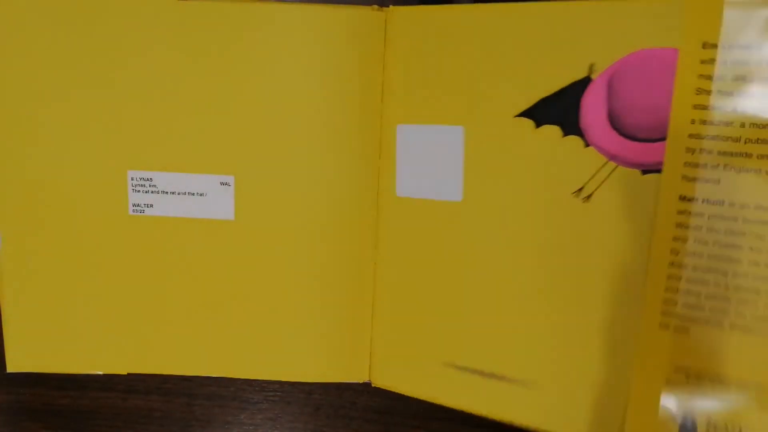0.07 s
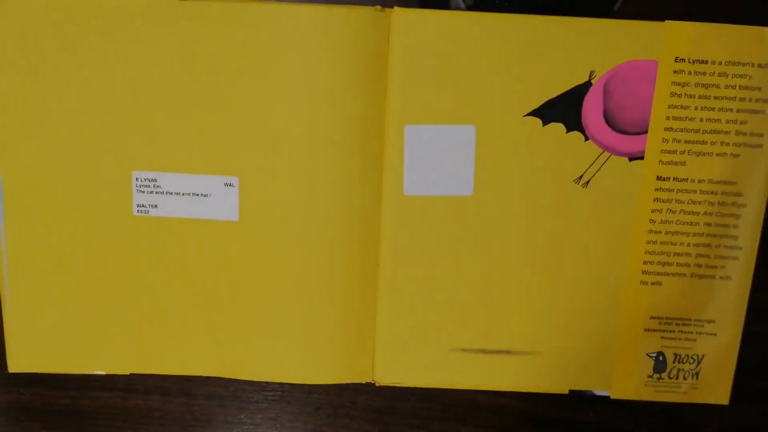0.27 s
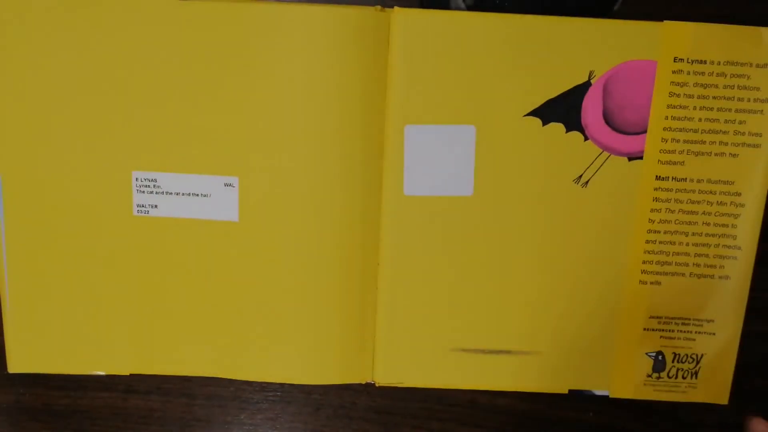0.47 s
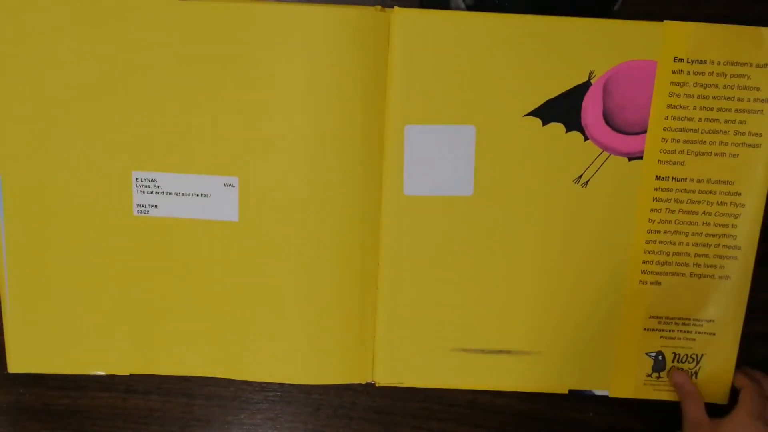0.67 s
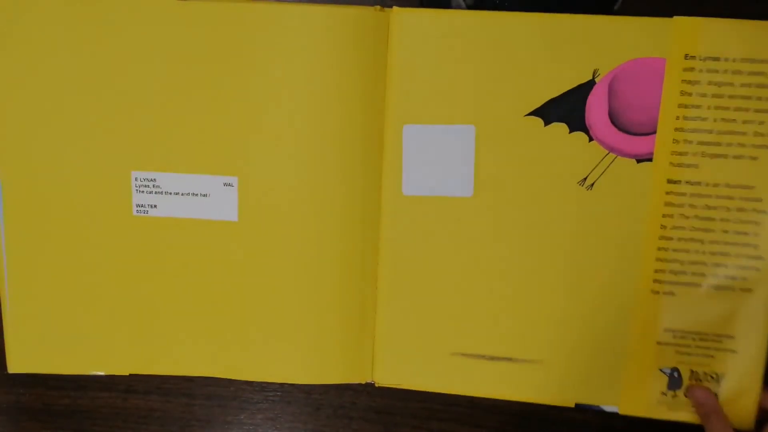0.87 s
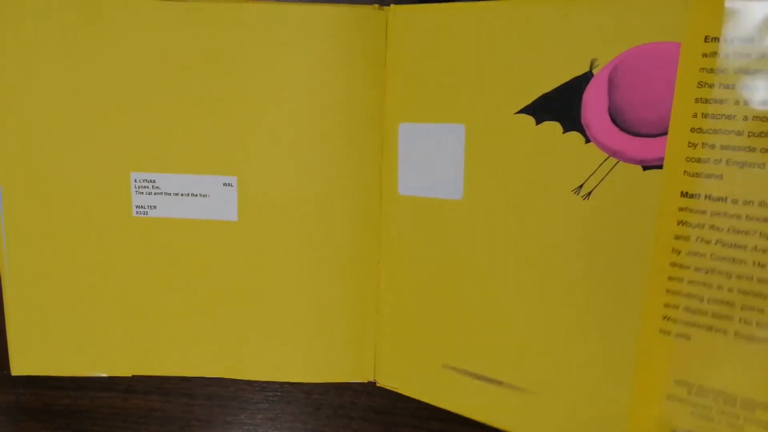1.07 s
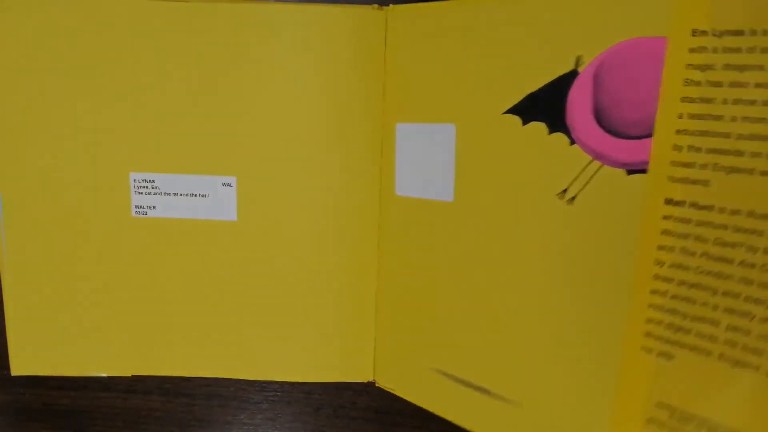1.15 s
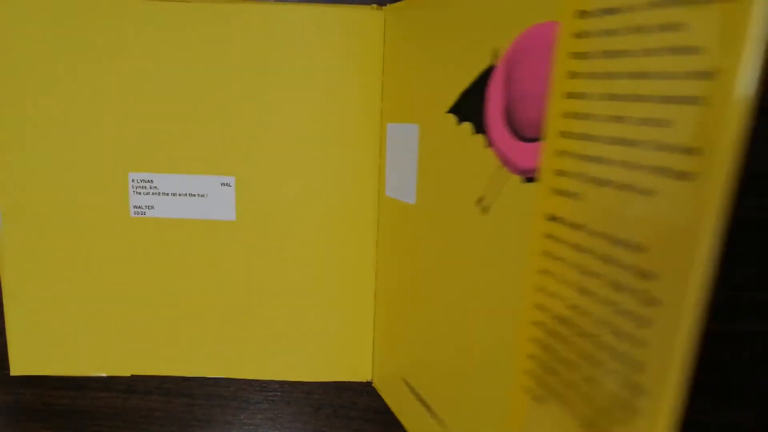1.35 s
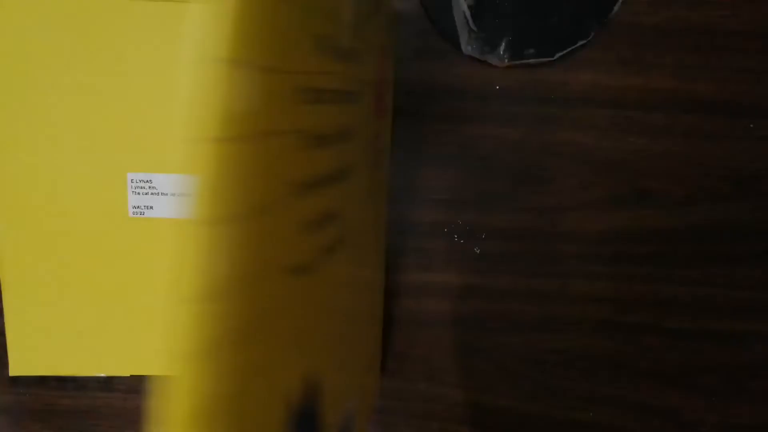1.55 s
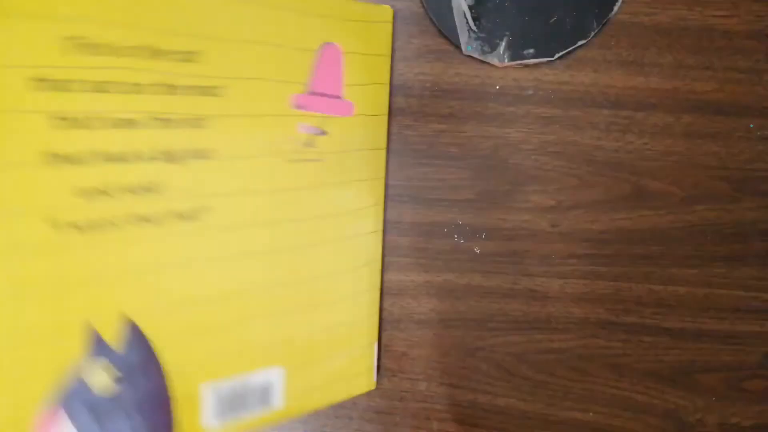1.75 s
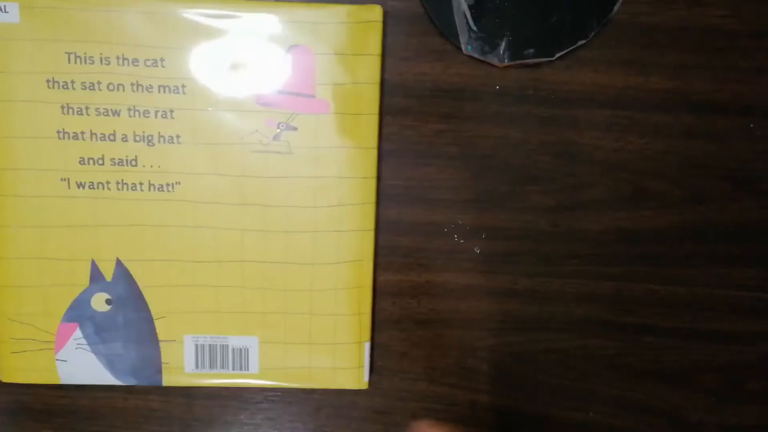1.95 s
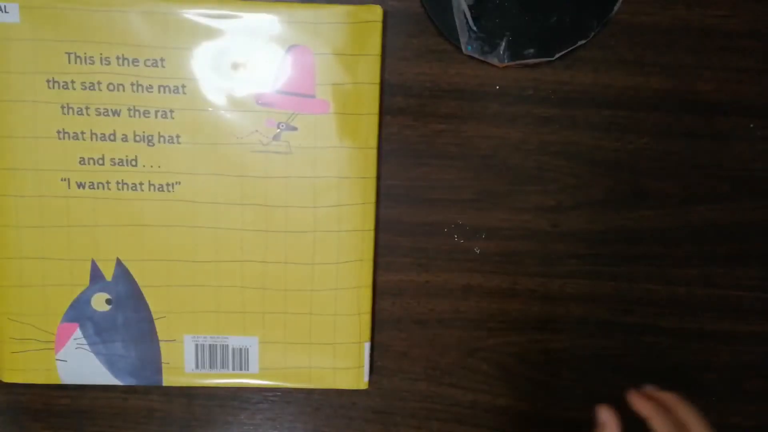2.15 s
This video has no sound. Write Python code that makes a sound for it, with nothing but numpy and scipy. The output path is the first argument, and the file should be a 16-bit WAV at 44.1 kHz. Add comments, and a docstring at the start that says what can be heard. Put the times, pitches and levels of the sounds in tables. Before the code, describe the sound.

Close to the microphones in a small room, a hardcover book slaps open onto a wooden table. Fingers lift the cover with light taps and jacket crinkles, moving left to right, until it falls closed with a thump.

```python
"""In a small, bare room, a hardcover book in a glossy jacket is handled on a wooden table.
The back cover drops open with a slap, pushing out air and making the table ring. Fingers lift it
while the jacket's creases crackle and paper rubs, and the book falls shut with a thump.
Two close microphones, each with its own treble ring, hear it move from left to right over a low rumble."""
import sys
import numpy as np
from scipy import signal
from scipy.fft import rfft, irfft
from scipy.io import wavfile

SR = 44100
rng = np.random.default_rng(int(sys.argv[2]) if len(sys.argv) > 2 else 0)


def transcribe(signal):
    """Save signal, clipped to [-1, 1], as a 16-bit WAV file at the path in sys.argv[1]."""
    frames = np.atleast_2d(signal).T
    limited = np.clip(frames, -1, 1)
    pcm = np.round(limited * 32767).astype(np.int16)
    wavfile.write(sys.argv[1], SR, pcm)


N = 97020
TIME = np.arange(N) / SR
HZ = np.maximum(np.fft.rfftfreq(2 * N, 1 / SR), 1)
TILT_FROM_HZ = 1500  # a tilt brightens or dulls a sound above this pitch
QUICK_S, RISE_SHARE = .0008, .3  # a very fast rise or fade; rise time as a share of fade time


def amp(db):
    """Turns decibels into a number to multiply by."""
    return 10 ** (np.asarray(db) / 20)


def read(points, hz=HZ):
    """Fills in a table between its pitches, giving each octave equal room."""
    pitches, values = np.transpose(points)
    return np.interp(np.log(hz + 1), np.log(pitches + 1), values)


def level(points):
    """Turns times and levels into a smoothly changing volume."""
    return amp(np.interp(TIME, *np.transpose(points)))


def unit(x):
    """Scales a sound to an average energy of 1 per channel."""
    return x / np.sqrt(np.mean(np.sum(x ** 2, -1)) + 1e-20)


def add(mix, start_s, sound):
    """Mixes a sound in at its start time."""
    part = mix[:, max(round(start_s * SR), 0):][:, :sound.shape[-1]]
    part += sound[..., :part.shape[1]]


def ring(gain, size=4096):
    """How a filter with this gain at each pitch rings after one click."""
    gain = np.interp(np.fft.rfftfreq(size, 1 / SR), HZ, gain)
    folded = irfft(np.log(np.maximum(gain, 1e-5)))
    folded[1:size // 2] *= 2
    folded[size // 2 + 1:] = 0  # nothing sounds before the click
    return irfft(np.exp(rfft(folded)))


def through(x, response):
    """Plays a sound through a filter's ring or a room's echo."""
    return signal.fftconvolve(np.atleast_2d(x), np.atleast_2d(response), axes=1)[:, :N]


def hump(hz, octaves):
    """A filter shape with one broad peak."""
    return 1 / (1 + (np.log2(HZ / hz) / octaves) ** 2 / 2) ** 2


def paired(x):
    """Makes two channels alike in the bass and leaves them unrelated in the treble."""
    left, right = rfft(x)
    hz = np.fft.rfftfreq(x.shape[1], 1 / SR)
    alike = 0.81 / (1 + (hz / 810) ** 2)
    right = alike * left + np.sqrt(abs(1 - alike ** 2)) * right
    return irfft(np.array([left, right]), x.shape[1])


def noise(size):
    """Plain hiss at the two microphones."""
    return paired(rng.standard_normal((2, size)))


def wash(gain, grain_db=0):
    """Steady filtered noise; grain_db makes it gritty."""
    grains = amp(grain_db * np.minimum(rng.exponential(1, N), 6))
    return unit(through(noise(N) * grains, ring(gain))) * np.sqrt(N)


def burst(rise_s, fade_s, uneven=0, size=4096):
    """A quick cluster of tiny touches; uneven lets random pitches stand out."""
    t = TIME[:size]
    shape = np.minimum(t / rise_s, 1) * np.exp(-np.maximum(t - rise_s, 0) / fade_s)
    spectrum = rfft(rng.standard_normal((2, size)) * shape)
    spectrum /= (abs(spectrum) + 1e-12) ** (1 - uneven)
    return unit(paired(irfft(spectrum)) * np.sqrt(shape))


# Where the moving cover is: time_s, side (plus is left, minus is right)
COVER_PATH = [(1.1, 1), (1.45, -0.68), (1.85, -1.3)]
def place(mix, start_s, sound):
    """Mixes a sound in so that the nearer microphone hears it earlier and louder."""
    side = np.interp(start_s, *np.transpose(COVER_PATH)) * np.array([[.5], [-.5]])
    hz = np.fft.rfftfreq(sound.shape[-1], 1 / SR)
    lag_s = np.round((side.max() - side) * 0.00018 * SR) / SR
    delayed = irfft(rfft(sound) * np.exp(-2j * np.pi * hz * lag_s), sound.shape[-1])
    add(mix, start_s, amp(1.5 * side) * delayed)


# The background's tone: pitch_hz, level_db
RUMBLE_TONE = [(38, -4.5), (120, -13.5), (250, -23), (16000, -44.5)]
def rumble():
    """A quiet, low noise lies under everything."""
    return amp(-69) * wash(amp(read(RUMBLE_TONE)))


# How loud the table hums: time_s, level_db
HUM_LEVELS = [(0, -67.5), (.48, -80), (.62, -69), (.9, -69.5), (1.3, -94)]
def table_hum():
    """The table hums faintly under the moving book."""
    return level(HUM_LEVELS) * wash(hump(hz=82, octaves=0.43))


# How loud the cover slides and bends: time_s, level_db
RUB_LEVELS = [(.02, -56), (.06, -87), (.17, -69), (.222, -44), (.45, -65.5), (.52, -99.5), (.77, -69),
              (.89, -64), (1, -70.5), (1.25, -75), (1.8, -72.5), (1.88, -53), (2, -100)]
# The rubbing's tone: pitch_hz, level_db
RUB_TONE = [(100, -6), (900, 0), (1600, -5), (16000, -17.5)]
def paper_rub():
    """Paper catches and slips in clumps of fine grains."""
    slips_s = np.arange(0, N / SR, .012)
    clumps_db = 3.5 * np.interp(TIME, slips_s, rng.standard_normal(len(slips_s)))
    return level(RUB_LEVELS) * amp(clumps_db) * wash(amp(read(RUB_TONE)), grain_db=6)


# Creases that snap (short) or crinkle (long): start_s, level_db, body_db, tilt_db_per_octave, fade_s
CREASES = [(0.0636, -18.5, -40, 7, .002), (.1897, -24, 8, -3, 0.001), (0.202, -19, -14, 3.5, 0.003),
           (0.3259, -19, 5, 8, 0.0043), (0.4229, -20.5, -4, -10.5, 0.0018),
           (0.7333, -25, -14.5, -1.5, 0.003), (0.7385, -25, -32, -7, .005), (0.7448, -24, -20, -8, .0007),
           (0.7508, -22, -7, -3, .001), (.756, -28, 5, 2, .003), (0.78, -19.5, 7.5, 19, 0.00093),
           (0.835, -25.5, -14, -1.5, 0.0052), (0.8812, -18.5, 6, 20.5, 0.0029),
           (0.9012, -26, 19, 0, 0.0012), (1.034, -21, -4, 2.5, 0.0013), (1.281, -32, -7.5, 2.5, 0.017),
           (1.441, -20, -5, 3.5, 0.0047), (1.5841, -27.5, 14.5, 14.5, 0.003),
           (1.832, -21, -3.5, 12, 0.0031), (1.8424, -24, -25, -3, 0.0036)]
# A crease's bright tick: pitch_hz, level_db
TICK_TONE = [(1000, -37.5), (3800, -27), (5200, -3.5), (9000, -7), (16000, -21)]
# A crease's hollow body: pitch_hz, level_db
BODY_TONE = [(200, -31), (750, -3), (1400, -12.5), (2700, 4.5), (4200, -5.5), (16000, -53.5)]
def jacket_crackle():
    """Creases snap with a bright tick and a hollow body; faint ones go off at random during the lift."""
    out, tick, body = np.zeros((2, N)), read(TICK_TONE), read(BODY_TONE)
    octaves = np.log2(np.maximum(HZ, TILT_FROM_HZ) / 6000)
    lift_s = (.76, 1.68)
    faint = [(np.interp(when, (0, 1), lift_s), -44 + 3 * strength, 0, 0, QUICK_S)
             for when, strength in rng.random((9, 2))]
    for start_s, level_db, body_db, tilt, fade_s in CREASES + faint:
        tone = ring(amp(tick + tilt * octaves) + amp(body + body_db))
        snap = through(burst(RISE_SHARE * fade_s, fade_s, uneven=.5), tone)
        place(out, start_s, amp(level_db) * unit(snap))
    return out


# Fingers knocking on the stiff cover: start_s, level_db, pitch_hz, fade_s
FINGER_BUMPS = [(0.128, -38, 1088, 0.0083), (0.4224, -27, 685, 0.0041), (0.7004, -27.5, 316, 0.014),
                (.851, -22, 728.6, 0.028), (1.0649, -26.5, 1055, 0.0053), (1.1295, -34.5, 1404, 0.0013),
                (1.806, -35.5, 600, 0.0098)]
def finger_knocks():
    """Each bump rings the cover briefly at one pitch, with a dull scuff around it."""
    out = np.zeros((2, N))
    for start_s, level_db, pitch_hz, fade_s in FINGER_BUMPS:
        shape = np.minimum(TIME / (RISE_SHARE * fade_s), 1) * np.exp(-TIME / fade_s)
        note = shape * np.sin(2 * np.pi * pitch_hz * TIME)
        scuff = through(burst(QUICK_S, fade_s), ring(hump(pitch_hz, octaves=.8)))
        place(out, start_s, amp(level_db) * unit(note))
        place(out, start_s, amp(level_db - 1) * unit(scuff))
    return out


# Paper landing on paper: start_s, level_db, rise_s, fade_s, tilt_db_per_octave
PAGE_SLAPS = [(0.227, -4, 0.0063, 0.0092, 1.5), (1.8747, -7, 0.0061, 0.017, -2)]
# A slap's tone: pitch_hz, level_db
SLAP_TONE = [(150, -2.5), (620, 7), (1500, 0.5), (3000, 0), (6000, -3), (16000, -12)]
def page_slaps():
    """The jacket and pages slap together as the book opens and shuts."""
    out = np.zeros((2, N))
    octaves = np.log2(np.maximum(HZ / TILT_FROM_HZ, 1))
    for start_s, level_db, rise_s, fade_s, tilt in PAGE_SLAPS:
        tone = ring(amp(read(SLAP_TONE) + tilt * octaves))
        slap = through(burst(rise_s, fade_s, uneven=.5), tone)
        place(out, start_s, amp(level_db) * unit(slap))
    return out


# The cover landing or bumping: start_s, level_db, high_cut_hz, low_cut_hz, ring_db (added to level_db)
COVER_HITS = [(0.2292, 1, 1014, 460, -9), (.234, -12, 854, 250, 2.5), (.704, -28.5, 155, 113, -3),
              (1.874, -21, 930, 570, -32), (1.878, -17.5, 1103, 682, -24), (1.882, -11, 234, 81, 4.5),
              (1.885, -13.5, 820, 594, -7.5)]
# The notes that ring after a hit (the table and covers, plus a deep boom, probably a shaken stand):
# pitch_hz, level_db
RINGING_NOTES = [(43, -6), (135.5, 6.5), (170, -8), (223, -3), (251, 1.5), (310, -2), (428, -3), (540, -3),
                 (690, 2), (1045, -4)]
def cover_thumps():
    """The cover pushes out a puff of air; the table and covers ring over a deep boom."""
    out, notes, t = np.zeros((2, N)), np.zeros(SR), TIME[:SR]
    for pitch_hz, level_db in RINGING_NOTES:
        ring_s = .11 + 38 / pitch_hz  # time to fade by 60 dB: low notes last longer
        notes += amp(level_db) * 1000 ** (-t / ring_s) * np.sin(2 * np.pi * pitch_hz * t)
    for start_s, level_db, high_cut_hz, low_cut_hz, ring_db in COVER_HITS:
        band = 1 / np.sqrt((1 + (HZ / high_cut_hz) ** 8) * (1 + (low_cut_hz / HZ) ** 6))
        puff = -unit(ring(band))
        place(out, start_s, amp(level_db) * puff)
        place(out, start_s, amp(level_db + ring_db) * unit(through(notes, puff)))
    return out


# How long the echo takes to fade by 60 dB: pitch_hz, length_s
ECHO_LENGTHS = [(500, 0.42), (6000, 0.44), (15000, 0.31)]
# The echo's tone: pitch_hz, level_db
ECHO_TONE = [(140, -19.5), (270, -10.5), (800, -10.5), (2000, -3), (15000, -6.5)]
def room_echo(sound):
    """Sound bounces off nearby surfaces, then blurs into a tail whose highest pitches die first."""
    hz, t, bands = signal.stft(noise(SR), SR, nperseg=256)
    length_s = read(ECHO_LENGTHS, hz)[:, None]
    bands *= 1000 ** (-t / length_s)
    bands *= np.sqrt(2 * np.log(1000) / (length_s * SR))  # a longer tail gets no extra energy
    bands *= amp(read(ECHO_TONE, hz))[:, None]
    echo = signal.istft(bands, SR, nperseg=256)[1]
    echo *= np.clip(TIME[:echo.shape[1]] / 0.02, 0, 1)
    add(echo, .002, amp(-7) * burst(QUICK_S, fade_s=0.013))  # the first bounces
    return through(sound, echo)


def scene():
    """The book, its echo and the background rumble."""
    book = page_slaps() + cover_thumps() + jacket_crackle() + finger_knocks() + paper_rub() + table_hum()
    return book + room_echo(book) + rumble()


# The left microphone's tone: pitch_hz, level_db
LEFT_TONE = [(4000, 2.5), (5200, 9.5), (6400, 16.5), (8800, -3), (12500, 1), (15000, 7), (16000, -24)]
# The right microphone's tone: pitch_hz, level_db
RIGHT_TONE = [(1800, 1), (4000, 0.5), (6400, 0), (8800, 10.5), (10500, 4.5), (15000, -7), (16000, -32)]
def record(dry):
    """Each microphone boosts its own part of the treble, then the very highest pitches are cut."""
    microphones = np.array([ring(amp(read(tone))) for tone in (LEFT_TONE, RIGHT_TONE)])
    high_cut = signal.firwin(511, 16200, window=("kaiser", 9), fs=SR)
    return signal.oaconvolve(through(dry, microphones), high_cut[None], "same")


dry = scene()
out = record(dry)
transcribe(out)
```